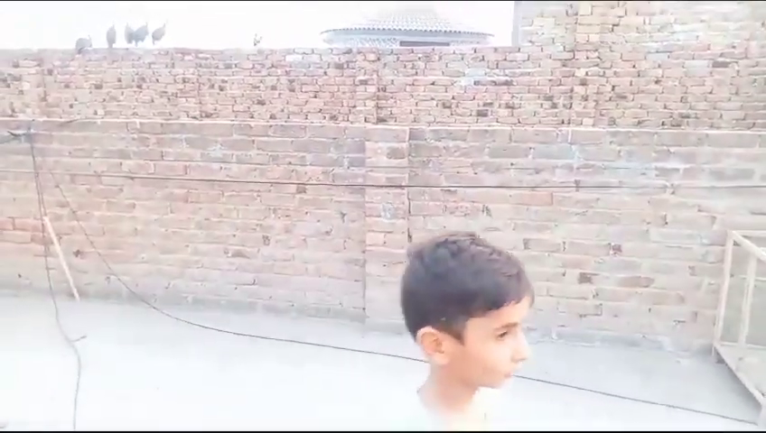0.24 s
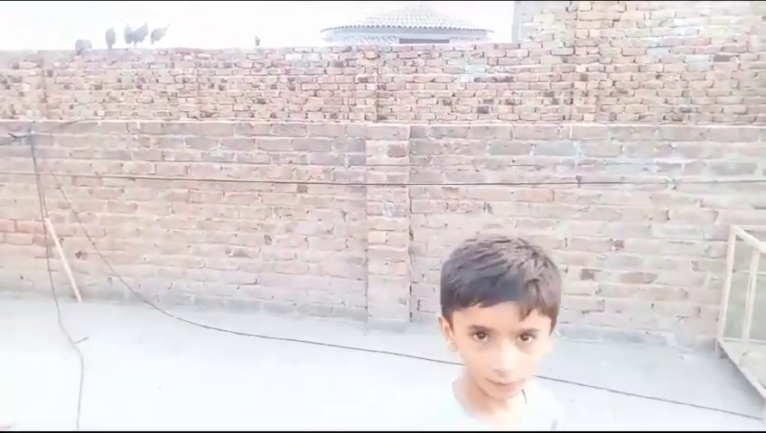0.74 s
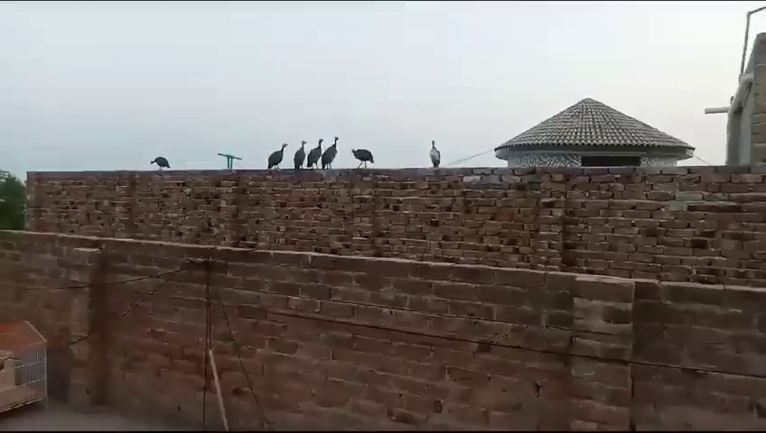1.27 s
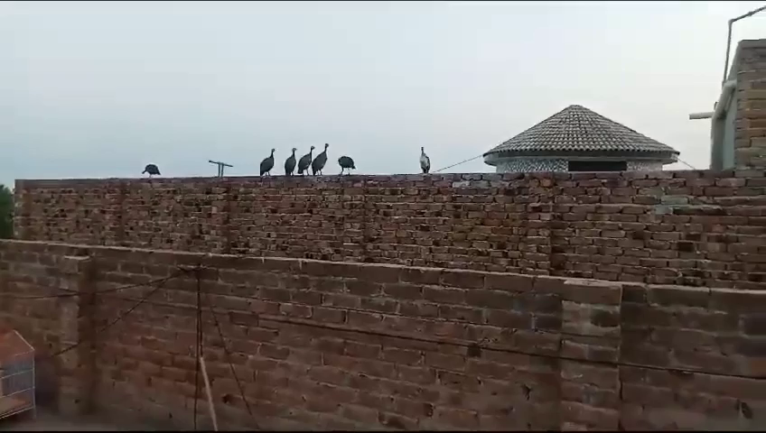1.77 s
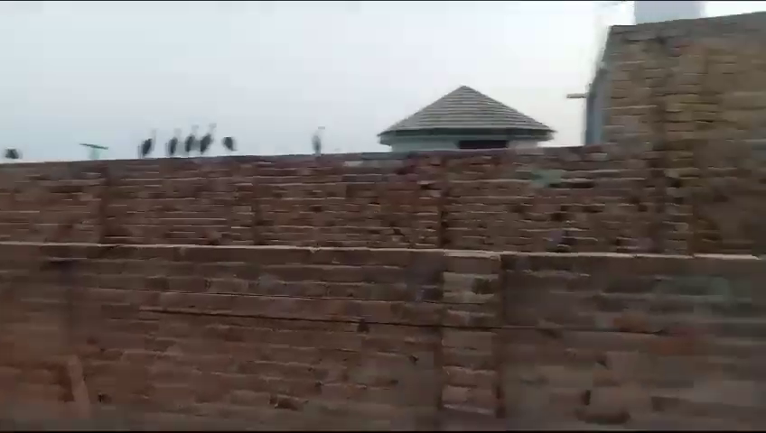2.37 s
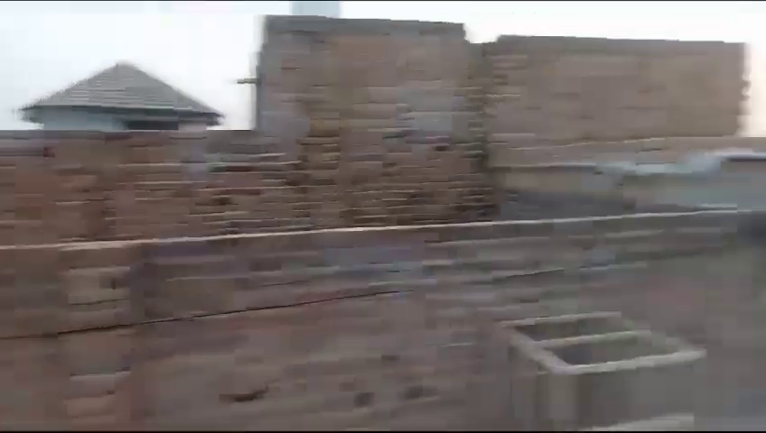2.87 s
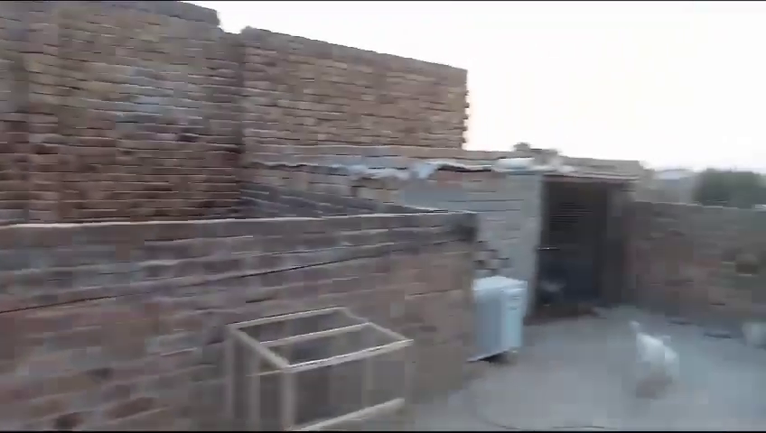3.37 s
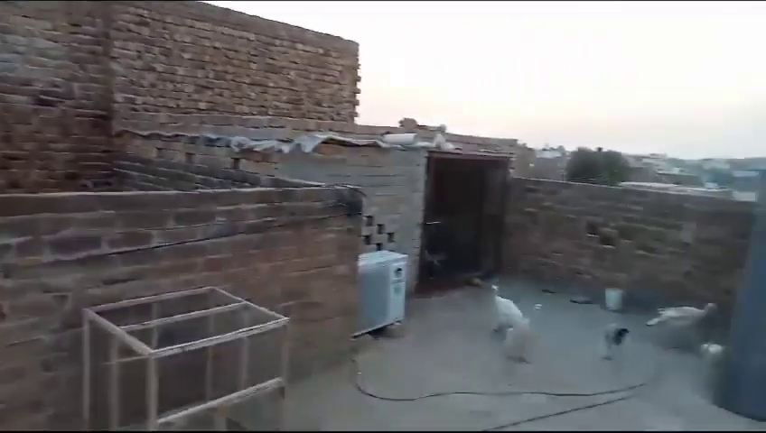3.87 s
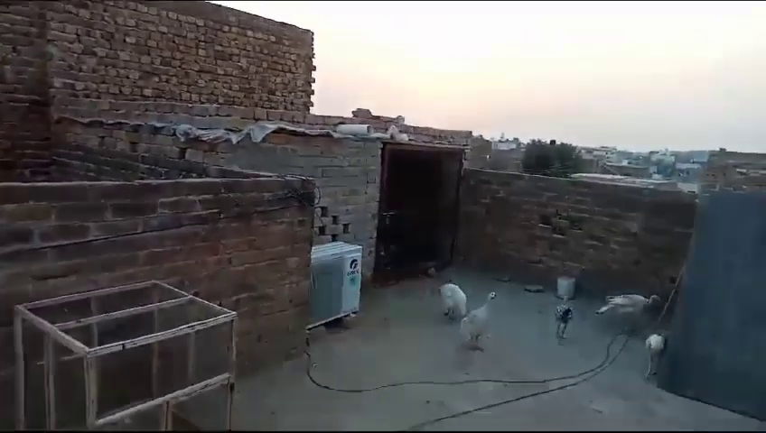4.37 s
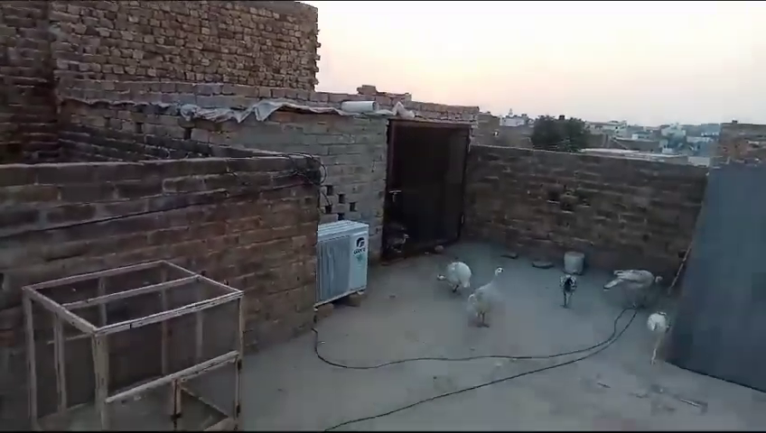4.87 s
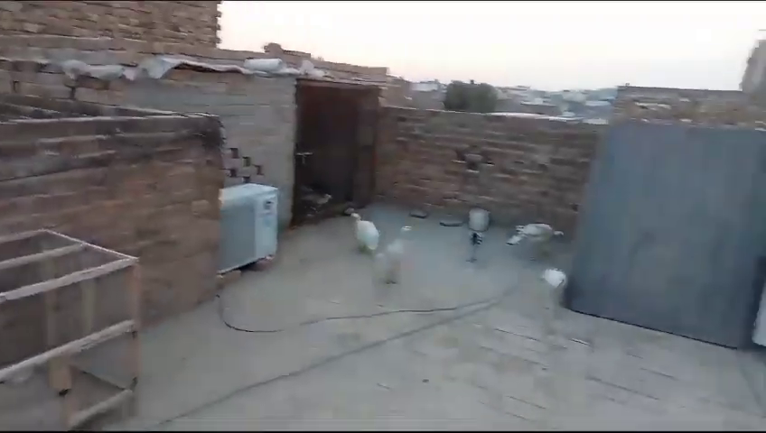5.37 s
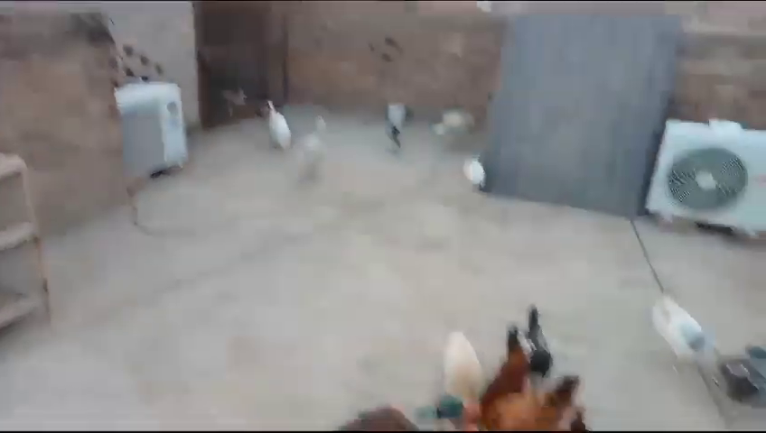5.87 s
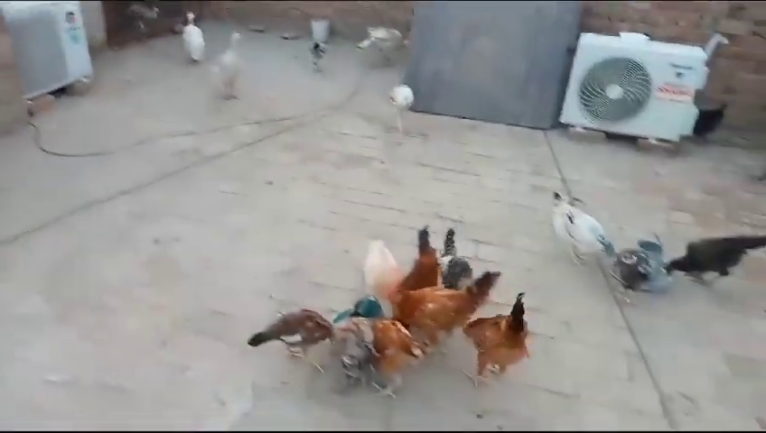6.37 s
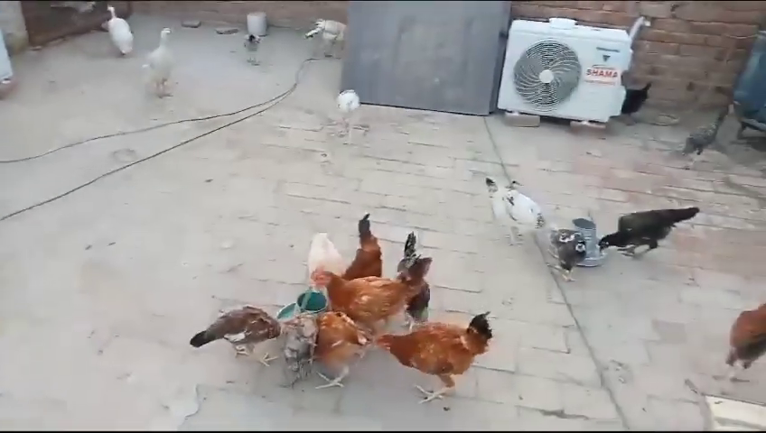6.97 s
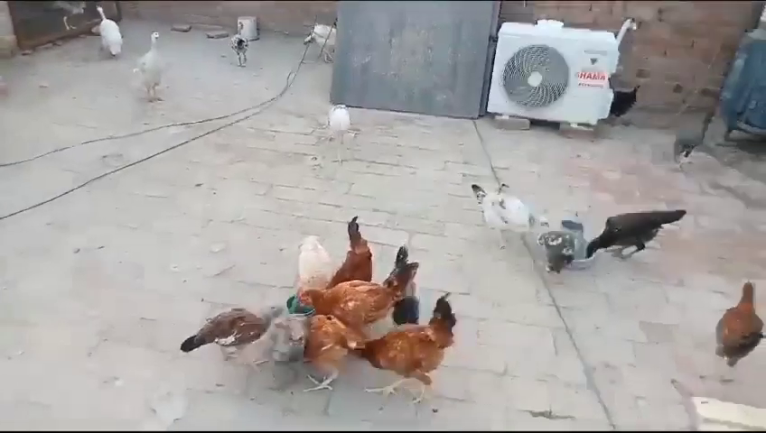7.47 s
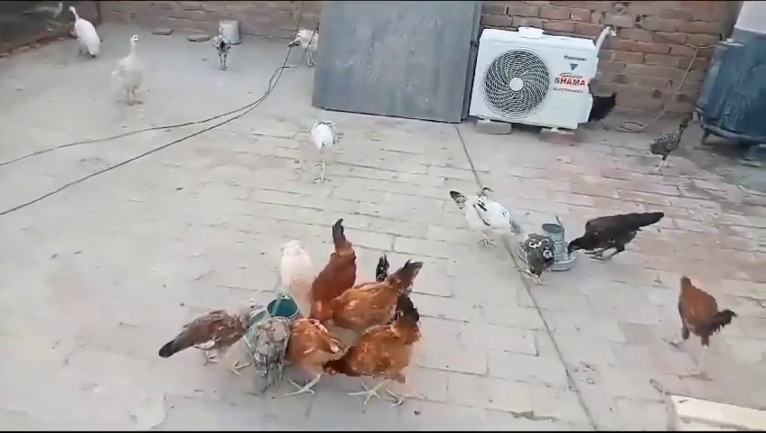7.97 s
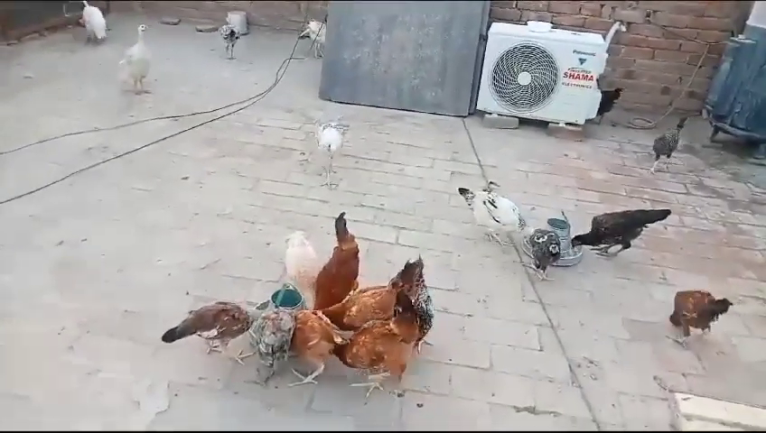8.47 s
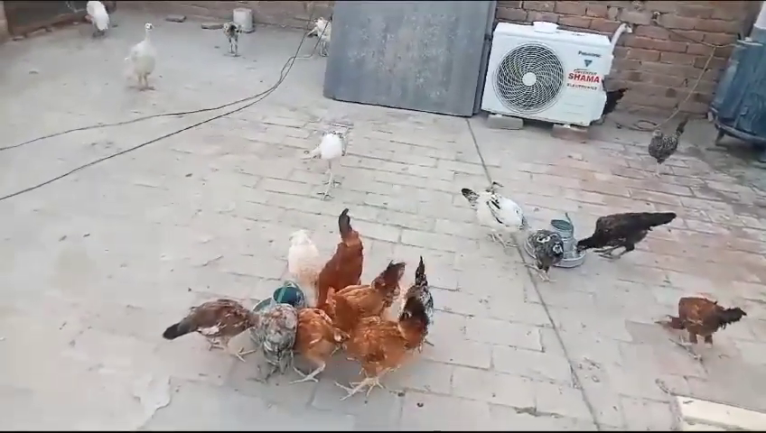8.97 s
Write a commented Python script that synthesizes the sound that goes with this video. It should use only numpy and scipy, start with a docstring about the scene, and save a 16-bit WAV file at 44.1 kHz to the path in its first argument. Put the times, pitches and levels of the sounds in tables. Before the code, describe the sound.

Outdoors on a hard roof terrace between brick walls, a low town rumble and soft airy wash sit underneath, the rumble strongest in the first second. At 0-1 s there are mellow hen notes, throaty clucks, gritty scuffs near 0.2 and 0.6-0.7 s, and soft footfalls. From about 1 s guinea fowl begin: short harsh squeaky chips, hoarse arching rasps and thin rising whines, with a bright peep near 2.9 s. Rasps strengthen through 3-4 s; chips crowd together from 4.3 to 5.9 s. A faint hum lies beneath from 1.4 to 5.7 s. At about 5.6 s a bird close to the microphone starts a loud, dry, buzzing cackle, each note a tiny whistle snapping into a rasp, about five per second, steady until the end after 9 s. Fainter rasps, whines and clucks continue behind, thinning out, with quick wall echoes throughout.

```python
"""Guinea fowl on a roof terrace

A flock between brick walls: harsh chips, thin whines, sliding peeps and hoarse rasps, all buzzing or
whistling from the syrinx, until one bird near the microphone settles into a loud, even cackle.
Hens cluck softly; scuffs and footfalls are short bursts of coloured noise on the floor.
The walls throw back quick echoes; beyond them filtered noise makes the town's rumble, wash and faint hum."""
import sys
import numpy as np
from scipy import signal
from scipy.fft import rfft, irfft, next_fast_len
from scipy.io import wavfile
from scipy.ndimage import uniform_filter1d, minimum_filter1d, map_coordinates

SR = 44100
rng = np.random.default_rng(int(sys.argv[2]) if len(sys.argv) > 2 else 0)


def to_wav(sig):
    """Store sig (one row per channel, or 1-D mono) as 16-bit WAV at the path in sys.argv[1].

    Samples outside -1..1 are clipped; the rate is SR.
    """
    pcm = np.clip(np.atleast_2d(sig), -1, 1) * 32767
    pcm = np.round(pcm).astype(np.int16)
    wavfile.write(sys.argv[1], SR, pcm.T)  # frames by channels


N = 407043

# Levels stand before fades and echoes; colours give relative levels, since each sound is rescaled.
# level of the town's rumble, before its gain: (time [s], level [dB])
RUMBLE_LEVEL = [(0.0, -43.5), (0.38, -47), (0.54, -40.5), (1.25, -51.5), (1.92, -49.5), (7.53, -56.5),
                (9.2, -57)]
# colour of the rumble: (frequency [Hz], level [dB])
RUMBLE_COLOUR = [(30, -29), (60, -13.5), (85, -0.5), (110, -2.5), (150, 3), (185, -5.5), (230, -8),
                 (400, -19), (900, -50)]
# colour of the outdoor wash: (frequency [Hz], level [dB])
WASH_COLOUR = [(15, -71.5), (25, -34.5), (118, -20.5), (293, -25), (397, -15), (493, -22.5), (943, -17.5),
               (1170, -16.5), (1330, -12.5), (1840, -15.5), (2140, -16.5), (3090, -9.5), (3600, -14),
               (4370, -32.5), (5680, -55), (9610, -120)]
# hens' drawn notes: (time [s], length [s], base pitch [Hz], level [dB])
HEN_CROONS = [(0, 0.032, 431, -36), (0.089, .074, 443.7, -35), (0.354, 0.057, 418, -28),
              (0.649, .1, 414, -39), (1.082, .13, 457, -37), (2.817, 0.094, 456, -41),
              (8.01, 0.099, 399, -48.5)]
# hens' clucks: (time [s], level [dB])
HEN_CLUCKS = [(.203, -35), (.759, -32), (.829, -29), (1.009, -31.5), (1.126, -25.5), (1.186, -27),
              (1.464, -32), (2.084, -32), (3.01, -32.5), (3.21, -35), (3.564, -31.5), (3.781, -24),
              (5.169, -35.5), (6.936, -30.5), (7.244, -34), (7.453, -33.5), (7.979, -32.5), (8.704, -33.5),
              (8.874, -30.5)]
# resonances of a hen's throat: (frequency [Hz], level [dB])
HEN_THROAT = [(200, -31.5), (420, -16), (800, 6.5), (1050, -13), (1400, 0), (2200, -9.5), (3500, -4),
              (6000, -49.5)]
# scuffs on the floor: (time [s], level [dB], rise [s], fade [s])
SCUFFS = [(.187, -15.5, 0.0015, 0.0052), (.201, -35, 0.0016, 0.003), (.598, -19, 0.011, 0.034),
          (.65, -27, .004, .02), (.7, -19, 0.0045, 0.0083), (4.5, -26.5, .004, 0.012),
          (8.715, -24.5, 0.0022, 0.011)]
# colour of a scuff: (frequency [Hz], level [dB])
SCUFF_COLOUR = [(300, -23.5), (2000, -21), (3000, 4), (3700, 3.5), (4800, -18), (7000, -22), (11000, -32.5),
                (15000, -60.5)]
# soft footfalls on the roof: (time [s], level [dB], rise [s], fade [s])
FOOTFALLS = [(.62, -45, .005, 0.075), (.82, -48, .005, .018), (1.16, -40.5, .005, 0.024),
             (7.14, -40, .01, 0.054)]
# colour of a footfall: (frequency [Hz], level [dB])
FOOTFALL_COLOUR = [(50, -24), (130, -15.5), (230, -0.5), (350, -10), (600, -2), (1200, -26.5), (4000, -56)]
# hoarse arching calls: (time [s], length [s], level [dB])
RASP_CALLS = [(0.398, 0.062, -35), (0.506, 0.039, -34), (0.931, .06, -32), (1.01, .07, -28.5),
              (1.095, .14, -22), (1.299, 0.11, -25), (1.547, .11, -23.5), (2.064, 0.098, -24),
              (2.256, .15, -21.5), (2.422, 0.13, -21.5), (2.735, 0.059, -20.5), (2.902, .11, -22.5),
              (3.062, 0.14, -24), (3.291, .1, -23.5), (3.422, 0.062, -21), (3.611, 0.15, -19.5),
              (3.767, 0.12, -31.5), (3.884, .15, -19.5), (4.033, .12, -18), (4.567, 0.076, -22),
              (4.757, .2, -17.5), (5.025, 0.065, -20.5), (5.13, 0.087, -22), (5.355, 0.065, -28),
              (5.532, .14, -17), (5.779, 0.08, -20.5), (6.196, 0.083, -19), (6.298, 0.099, -20.5),
              (6.556, 0.099, -29), (6.844, .1, -24.5), (7.038, .13, -19.5), (7.568, 0.12, -28.5),
              (8.35, 0.12, -26.5), (8.856, 0.086, -34.5)]
# resonances of a rasping throat: (frequency [Hz], level [dB])
RASP_THROAT = [(400, -45), (750, -28), (1080, -7.5), (1350, -8.5), (1800, 9), (2150, 1.5), (2500, 2.5),
               (3300, 3), (4000, -18.5), (4800, -30.5), (6500, -39), (8500, -49), (11000, -40),
               (15000, -75.5)]
# thin sliding peeps: (time [s], length [s], first pitch [Hz], last pitch [Hz], level [dB])
PEEP_CALLS = [(0.83, .022, 2570, 3080, -35), (0.412, 0.028, 2750, 3130, -28.5),
              (1.1, 0.027, 3740, 3430, -25.5), (1.271, 0.047, 3050, 3720, -28),
              (2.643, 0.13, 3295, 3036, -33), (2.934, 0.063, 3153, 3367, -15),
              (3.066, 0.035, 1724, 1506, -25), (3.269, 0.056, 2525, 2570, -29),
              (3.412, 0.026, 3110, 3060, -24.5), (3.981, .032, 2200, 1907, -17.5),
              (4.244, 0.028, 3650, 3200, -21.5), (6.178, 0.029, 2440, 2630, -28),
              (6.854, .034, 2380, 2800, -27.5), (7.083, 0.015, 2480, 2660, -23),
              (8.868, .053, 2960, 2950, -26)]
# short harsh chips: (time [s], relative level [dB], length [s], brightness [dB per octave])
CHIP_CALLS = [(1.189, -5, 0.03, 0), (1.516, -5.5, 0.033, 1.5), (1.746, -1.5, 0.021, -0.5),
              (1.917, -5, 0.0275, -1), (2.06, -9, 0.037, -2.5), (2.275, -13.5, .04, 6.5),
              (2.475, -12.5, 0.029, 9), (2.736, -12.5, 0.032, 5), (4.255, -11.5, 0.017, 3.5),
              (4.344, -7, .029, -2), (4.543, -3, 0.026, -1.5), (4.747, -6.5, 0.042, -1),
              (4.903, -5.5, 0.046, -1), (5.024, -10.5, 0.031, -1.5), (5.13, -4, 0.039, 0),
              (5.235, -11.5, 0.052, 0.5), (5.331, -10.5, 0.048, -3.5), (5.444, -5, 0.05, 1.5),
              (5.654, -10.5, 0.022, 0.5), (5.766, -5.5, 0.047, 4), (5.906, -4.5, .028, 0)]
# resonances of a chipping throat: (frequency [Hz], level [dB])
CHIP_THROAT = [(500, -69), (1100, -16.5), (2000, -6), (2600, 6), (3150, 4), (3700, 1.5), (4300, -18),
               (5300, -29.5), (6300, -45), (8500, -55), (11000, -55), (15000, -94.5)]
# one bird's whines: (time [s], length [s], relative level [dB], octave partial [dB], roughness [0-1])
WHINE_CALLS = [(1.287, 0.123, -21, -20, 0.44), (2.25, 0.11, -25, -6, 0.5), (2.91, .12, -24.5, -10.5, 0.36),
               (3.29, 0.075, -20.5, -31, 0.5), (3.618, 0.12, -19.5, -7, 0.25),
               (4.05, 0.13, -27, -20.5, 0.5), (4.284, .11, -14.5, -9, .2), (5.06, 0.11, -17, -13.5, 0.07),
               (5.71, .11, -20.5, -5, 0.28), (6.393, 0.12, -21.5, -1, 0.41), (7.055, 0.17, -29, 0, 0.28)]
# the near bird's cackle, about five notes a second: (time [s], relative level [dB], length [s])
CACKLE_NOTES = [(5.582, -0.5, .045), (5.779, 3, 0.017), (6.041, 3, 0.025), (6.257, 0.5, 0.025),
                (6.465, -1.5, 0.038), (6.711, -2, .045), (6.903, -2, 0.037), (7.097, -1.5, .036),
                (7.275, 1, 0.037), (7.501, -1, 0.039), (7.729, -3, 0.033), (7.94, 2.5, 0.034),
                (8.134, 1.5, 0.04), (8.336, -0.5, 0.034), (8.572, 0, 0.037), (8.762, 0, 0.041),
                (8.978, 1.5, 0.033), (9.205, 0, 0.099)]
# base pitch of the cackle as the bout goes on: (time [s], pitch [Hz])
CACKLE_PITCH = [(5.6, 391.8), (6.5, 389.6), (7.27, 399), (7.5, 391), (8.13, 400.8), (8.76, 387.4),
                (9.2, 396)]
# resonances of the cackling throat, before its tilt: (frequency [Hz], level [dB])
CACKLE_THROAT = [(400, -53.5), (800, -49.5), (1170, -22), (1550, -19), (1980, -12), (2380, 3), (2750, -10),
                 (3200, -5), (3600, -7), (4100, -20.5), (5200, -39), (7000, -50.5), (11000, -62),
                 (15000, -74)]
# first echoes off the walls: (delay [s], relative level [dB])
WALL_ECHOES = [(0.0111, -3), (0.0221, -12.5), (0.026, -10.5), (.036, -18.5), (0.05, -16)]

TOP_HZ = 15500  # highest partial of a buzz, and the top of the microphone channel
# base pitches [Hz], their spread from call to call [share] and roughness [0-1]
CLUCK_HZ, CLUCK_SPREAD = 386.4, .02
RASP_HZ, RASP_SPREAD, RASP_ROUGH = 361.8, .02, .42
CHIP_HZ, CHIP_ROUGH = 1048.6, 0.85
WHINE_HZ, WHINE_SPREAD = 1795, .015
CACKLE_ROUGH, CACKLE_TILT_DB = 0.22, -2.5  # roughness at the start of a note; tilt [dB per octave]
DRONE_START_S, DRONE_LENGTH_S, DRONE_FADE_S, DRONE_DB = 1.4, 4.3, 0.39, -49


def undb(db):
    """Decibels to gain."""
    return 10 ** (np.asarray(db) / 20)


def unit(x):
    """Scale to rms 1."""
    return x / np.sqrt(np.mean(x ** 2) + 1e-18)


def clock(length):
    """Sample times [s] of a sound at least 5 ms long."""
    return np.arange(int(max(length, .005) * SR)) / SR


def add(out, start, x):
    """Mix x in at a time [s]."""
    i = int(max(start, 0) * SR)
    out[i:i + len(x)] += x[:max(N - i, 0)]


def colour(x, points, tilt_db=0):
    """Filter by a (frequency [Hz], level [dB]) outline, tilted per octave; rms 1."""
    size = next_fast_len(2 * len(x))
    octave = np.log2(np.fft.rfftfreq(size, 1 / SR) + 1)
    hz, db = np.transpose(points)
    tilted_db = db + tilt_db * np.log2(hz / hz[0])
    gain = undb(np.interp(octave, np.log2(hz), tilted_db))
    return unit(irfft(rfft(x, size) * gain, size)[:len(x)])


def wander(t, rate):
    """Smooth chance with a spread near 1, drawn at `rate` knots per second."""
    knots = rng.standard_normal(int(t[-1] * rate) + 3)
    return map_coordinates(knots, [t * rate], order=2, mode="nearest")


def gate(t, rise, fall):
    """Rounded opening and closing of a sound, over rise and fall [s]."""
    opening = np.sin(np.pi / 2 * np.clip(t / rise, 0, 1))
    closing = np.sin(np.pi / 2 * np.clip((t[-1] - t) / fall, 0, 1)) ** 2
    return opening * closing


def syrinx(t, hz, rough, jitter=0.047, hiss=1.0):
    """Membrane buzz, harmonics at random phases so it is less spiky; roughness jitters it and adds air."""
    rough = np.clip(rough, 0, 1)
    phase = 2 * np.pi * np.cumsum(hz * (1 + jitter * rough * wander(t, 329.5))) / SR
    orders = np.arange(1, int(TOP_HZ / np.max(hz)))
    random_phases = rng.uniform(0, 2 * np.pi, size=(128, 1))[orders]
    buzz = unit(np.cos(np.outer(orders, phase) + random_phases).sum(axis=0))
    # noise that puffs once a cycle
    air = unit((1 + np.cos(phase)) * rng.standard_normal(len(t)))
    return (buzz + hiss * rough * air) * undb(4.0 * rough * wander(t, 219))


def town(wash_db=-41.0, rumble_db=3):
    """Distant noise: a low rumble of changing level under a lightly flickering outdoor wash."""
    t = np.arange(N) / SR
    rumble_level = undb(np.interp(t, *np.transpose(RUMBLE_LEVEL)) + rumble_db)
    rumble = colour(rng.standard_normal(N), RUMBLE_COLOUR) * rumble_level
    flicker = undb(2 * wander(t, 9))
    wash = colour(rng.standard_normal(N), WASH_COLOUR) * undb(wash_db) * flicker
    return rumble + wash


def hens(cluck_s=0.025, croon_tilt_db=-6, cluck_tilt_db=-1):
    """Soft, mellow falling notes and short throaty clucks: a syrinx buzz coloured by the throat."""
    out = np.zeros(N)
    notes = [(*row, .25, croon_tilt_db) for row in HEN_CROONS]
    for start, db in HEN_CLUCKS:
        hz = CLUCK_HZ * (1 + CLUCK_SPREAD * rng.standard_normal())
        notes.append((start, cluck_s, hz, db, .9, cluck_tilt_db))
    for start, length, hz, db, rough, tilt_db in notes:
        t = clock(length)
        voice = syrinx(t, hz * (1.04 - .1 * t / length), rough, jitter=.08, hiss=1.4)
        add(out, start, undb(db) * colour(voice, HEN_THROAT, tilt_db) * gate(t, 0.0023, 0.019))
    return out


def contacts(rows, outline):
    """Gritty touches on the floor: uneven noise that rises at once and fades quickly."""
    out = np.zeros(N)
    for start, db, rise, fade in rows:
        t = clock(3 * fade)
        grit = rng.standard_normal(len(t)) * undb(1 * wander(t, 800))
        envelope = np.minimum(t / rise, 1) * np.exp(-t / fade)
        add(out, start, undb(db) * colour(grit, outline) * envelope)
    return out


def rasps(arch=0.1323, closed_tilt_db=-9, jitter=.055, hiss=0.47, throb_db=2.5):
    """Hoarse calls: as the bird pushes, the beak opens and pitch and resonances arch up together."""
    out = np.zeros(N)
    for start, length, db in RASP_CALLS:
        t = clock(length)
        push = np.sin(2.7 * t / length) ** 2
        hz = RASP_HZ * (1 + RASP_SPREAD * rng.standard_normal())
        pitch = hz * (1 + 0.0354 * wander(t, 90.14))
        voice = syrinx(t, pitch, RASP_ROUGH * (.5 + .6 * push), jitter, hiss)
        voice = voice * undb(throb_db * wander(t, 110))
        open_beak = colour(voice, RASP_THROAT)
        closed_beak = 0.52 * colour(voice, RASP_THROAT, closed_tilt_db)
        call = push * open_beak + (1 - push) * closed_beak
        # reading the call faster raises pitch and resonances alike
        tension = 1 + arch * (push - .65)
        call = map_coordinates(call, [np.cumsum(tension)], order=3, mode="mirror")
        add(out, start, undb(db) * call * gate(t, 0.021, 0.022))
    return out


def peeps(waver=0.024, flutter_db=4):
    """Brief, quavering whistles: a sine that slides between two pitches."""
    out = np.zeros(N)
    for start, length, first_hz, last_hz, db in PEEP_CALLS:
        t = clock(length)
        pitch = np.linspace(first_hz, last_hz, len(t)) * (1 + waver * wander(t, 290))
        whistle = np.sin(2 * np.pi * np.cumsum(pitch) / SR)
        note = unit(whistle * undb(flutter_db * wander(t, 180)))
        add(out, start, undb(db) * note * gate(t, 0.15 * length, 0.23 * length))
    return out


def chips(fall=.12, gain_db=-7.0, drain=0.97, attack_s=0.0095):
    """A sudden rough squeak, falling in pitch as its pressure drains."""
    out = np.zeros(N)
    for start, db, length, bright_db in CHIP_CALLS:
        t = clock(length)
        pitch = CHIP_HZ * (1 + fall * (.3 - t / length))
        voice = syrinx(t, pitch, CHIP_ROUGH, jitter=0.069, hiss=1.0)
        burst = colour(voice * np.exp(-drain * t / length), CHIP_THROAT, bright_db)
        add(out, start - .004, undb(db + gain_db) * burst * gate(t, attack_s, .008))
    return out


def whines(third_db=-38, fourth_db=-55, sixth_db=-55, jitter=0.046, sideband=0.18, swell_db=6,
           gain_db=1, rise=.075):
    """Thin notes that rise and swell with the push; a slower second membrane makes the peak hoarse."""
    out = np.zeros(N)
    for start, length, db, octave_db, rough in WHINE_CALLS:
        t = clock(length)
        push = np.sin(2.14 * t / length) ** 2
        hz = WHINE_HZ * (1 + WHINE_SPREAD * rng.standard_normal())
        bend = rise * np.sin(2.227 * t / length)
        pitch = hz * (.945 + bend + jitter * rough * wander(t, 300))
        phase = 2 * np.pi * np.cumsum(pitch) / SR
        soft_db = swell_db * (push - 1)  # only the two lowest partials swell
        levels_db = (soft_db, soft_db + octave_db, third_db, fourth_db, sixth_db)
        note = np.zeros(len(t))
        for order, partial_db in zip((1, 2, 3, 4, 6), levels_db):
            note += undb(partial_db + 2 * wander(t, 70)) * np.sin(order * phase)
        second_membrane = 1 + sideband * rough * push * np.sin(phase / 5)
        flutter = second_membrane * undb(3.8 * rough * wander(t, 200))
        envelope = gate(t, 0.06 * length, 0.23 * length)
        add(out, start, np.sqrt(2) * undb(db + gain_db) * note * flutter * envelope)
    return out


def drone(hz=174, width=.13):
    """A faint low hum from the town: narrow-band noise that fades in, holds and fades out."""
    out, t = np.zeros(N), clock(DRONE_LENGTH_S)
    band = [(hz * (1 - 2 * width), -45), (hz * (1 - width), -12), (hz, 0),
            (hz * (1 + width), -14), (hz * (1 + 2 * width), -50), (2000, -120)]
    hum = colour(rng.standard_normal(len(t)), band)
    add(out, DRONE_START_S, undb(DRONE_DB) * hum * gate(t, DRONE_FADE_S, DRONE_FADE_S))
    return out


def cackle(lead=.012, whistle_hz=2980, whistle_db=-11, gain_db=-6.5, glide=0.0863, attack_s=0.0013,
           peak_s=0.011, sag_db_per_s=200, fray=0.55):
    """A brief whistle breaks into a rising buzz whose sixth harmonic rings the throat."""
    out = np.zeros(N)
    for start, db, length in CACKLE_NOTES:
        t = clock(lead + 0.0096)
        slide = whistle_hz * (.97 + 0.062 * t / t[-1] + 0.046 * wander(t, 240))
        whistle = np.sin(2 * np.pi * np.cumsum(slide) / SR) * np.sqrt(2)
        add(out, start - lead, undb(db + whistle_db) * whistle * gate(t, .012, .004))

        t = clock(length)
        hz = np.interp(start, *np.transpose(CACKLE_PITCH))
        pitch = hz * (1.036 - glide * np.exp(-t / 0.0153) + .012 * wander(t, 94))
        # the note frays as the pressure runs out
        voice = syrinx(t, pitch, CACKLE_ROUGH + fray * (t / length) ** 2)
        pressure = undb(-sag_db_per_s * np.abs(t - peak_s))
        shaped = voice * pressure * gate(t, attack_s, .011)
        buzz = colour(shaped, CACKLE_THROAT, CACKLE_TILT_DB)
        add(out, start - .003, undb(db + gain_db) * buzz * gate(t, .002, .002))
    return out


def terrace(x, t60, tail_db, echo_db, sway=0.0009854):
    """Echoes from the nearest walls, shifting as the listener moves, then scatter that escapes to the sky."""
    t = clock(.6)
    scatter = rng.standard_normal(len(t)) * undb(2.3 * rng.standard_normal(len(t)))
    # t60 [s] is the time to fall 60 dB; the tail fades in after 7.5 ms
    tail = scatter * np.exp(-np.log(1000) * t / t60) * np.clip(t / 0.015 - .5, 0, 1)
    out = x + undb(tail_db) * signal.fftconvolve(x, tail / np.linalg.norm(tail))[:N]
    now = np.arange(N) / SR
    for delay, db in WALL_ECHOES:
        path = delay + sway * wander(now, 1.0)
        echo = map_coordinates(x, [(now - path) * SR], order=3)
        out = out + undb(db + echo_db) * echo
    return out


def scene():
    """The near cackler, the more echoing flock around it, feet on the roof and the town beyond."""
    birds = hens() + rasps() + peeps() + chips() + whines()
    feet = contacts(SCUFFS, SCUFF_COLOUR) + contacts(FOOTFALLS, FOOTFALL_COLOUR)
    around = terrace(birds + feet, t60=0.35, tail_db=-7, echo_db=-2)
    near = terrace(cackle(), t60=0.38, tail_db=-10.5, echo_db=-4)
    return (town() + around + drone() + near)[None]


def record(dry, ceiling=0.76):
    """The phone's limiter eases the gain down around the highest peaks; the top is cut."""
    span = int(.004 * SR)
    room = np.minimum(1, min(ceiling, .9) / (np.abs(dry[0]) + 1e-9))
    lowest = minimum_filter1d(room, 2 * span + 1)
    gain = uniform_filter1d(uniform_filter1d(lowest, span), span)
    top_cut = signal.ellip(8, .2, 70, TOP_HZ, fs=SR, output="sos")
    return signal.sosfilt(top_cut, dry * gain)


dry = scene()
out = record(dry)
to_wav(out)
```